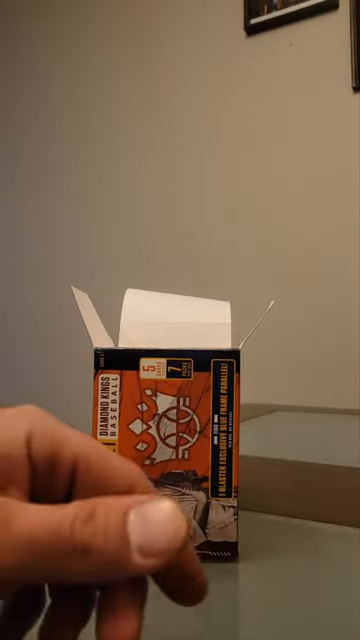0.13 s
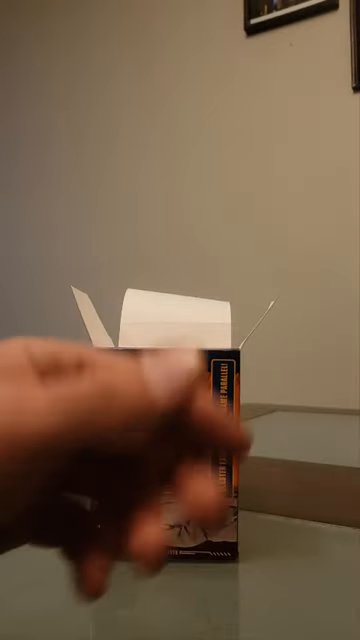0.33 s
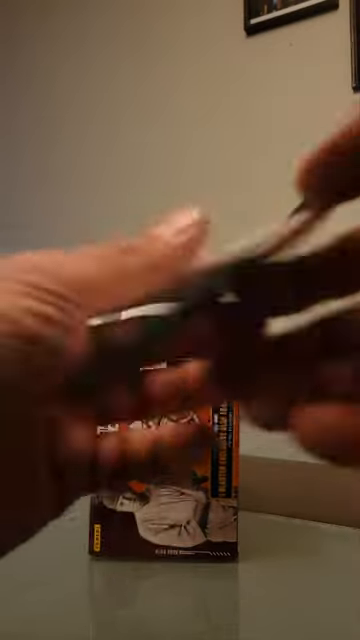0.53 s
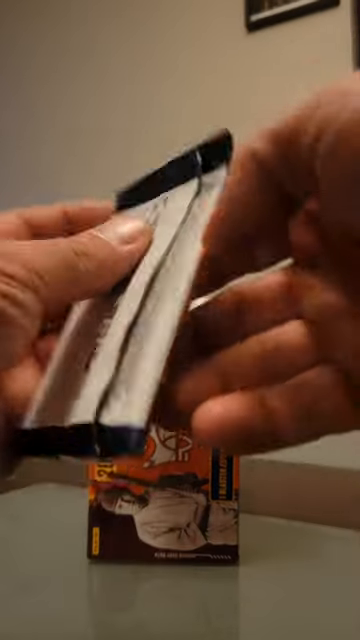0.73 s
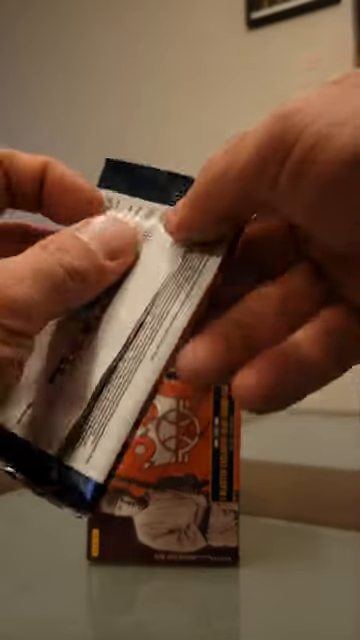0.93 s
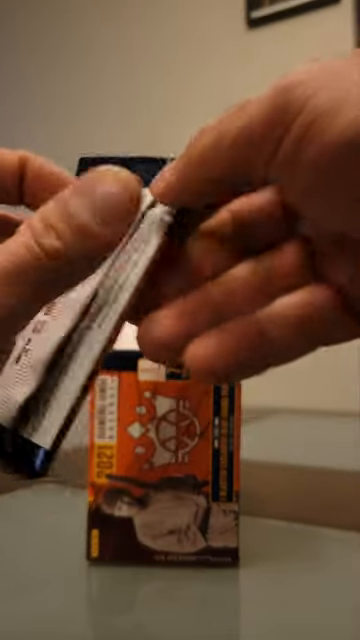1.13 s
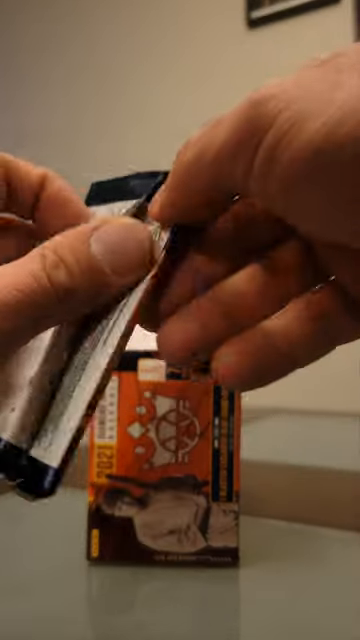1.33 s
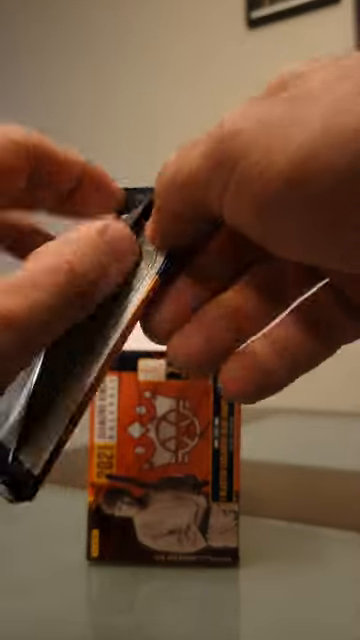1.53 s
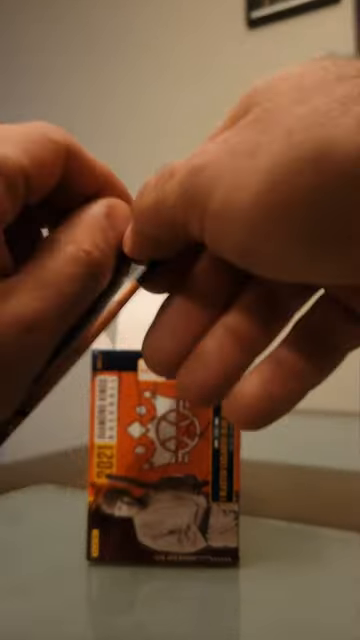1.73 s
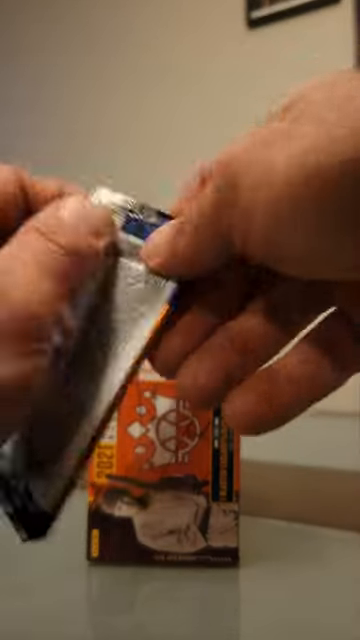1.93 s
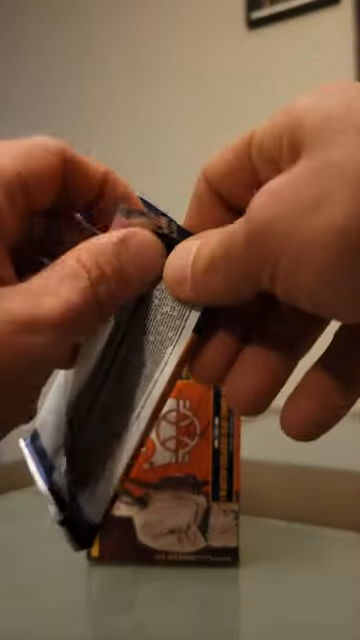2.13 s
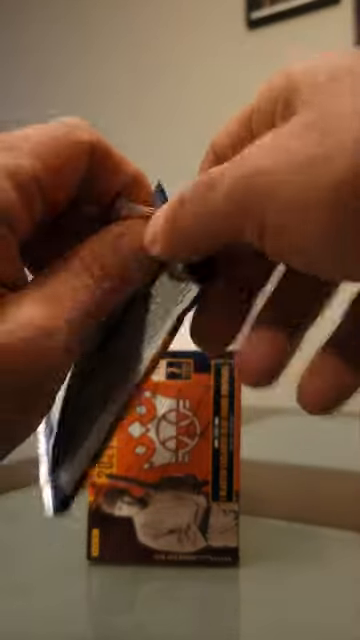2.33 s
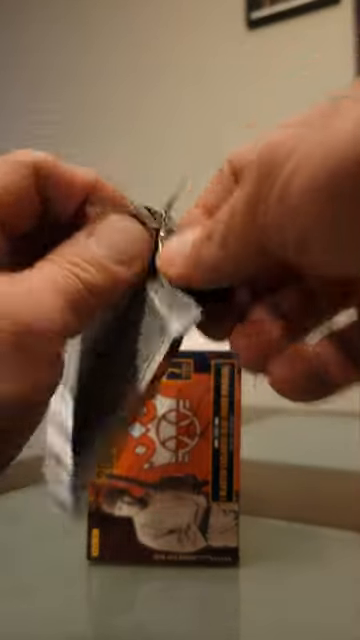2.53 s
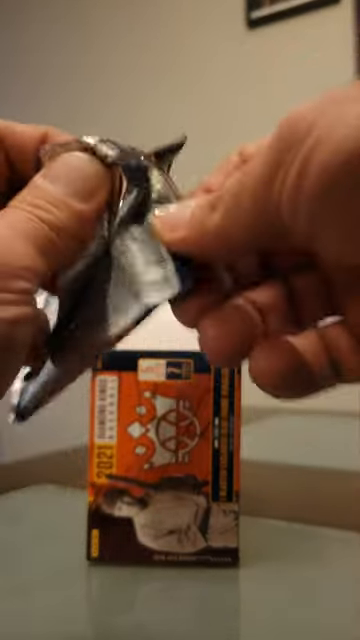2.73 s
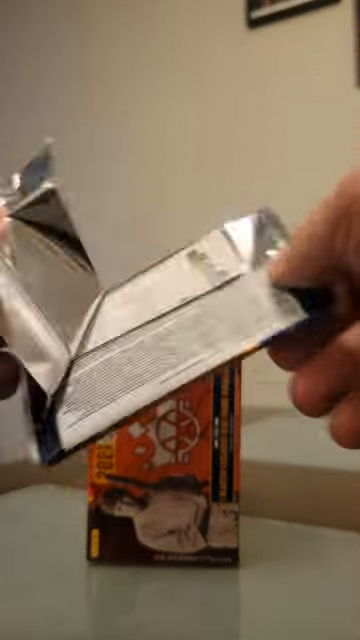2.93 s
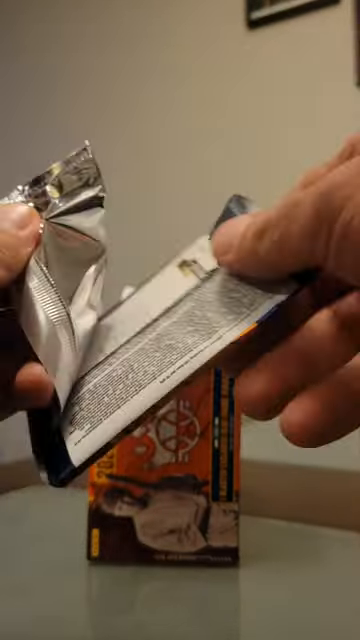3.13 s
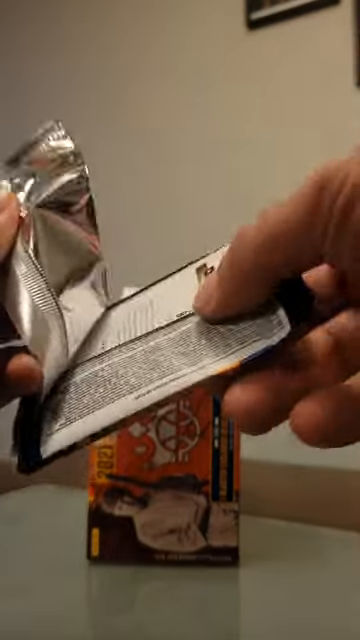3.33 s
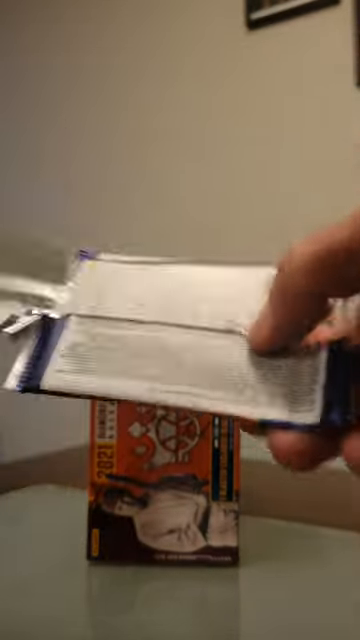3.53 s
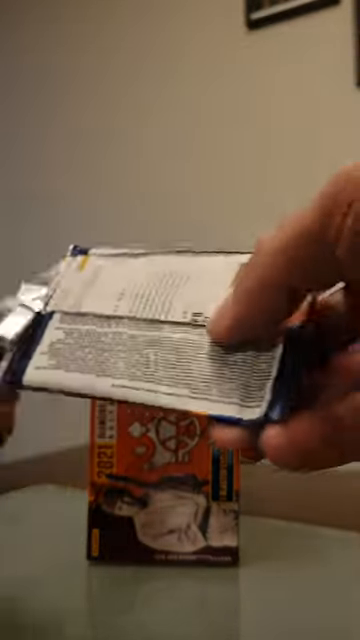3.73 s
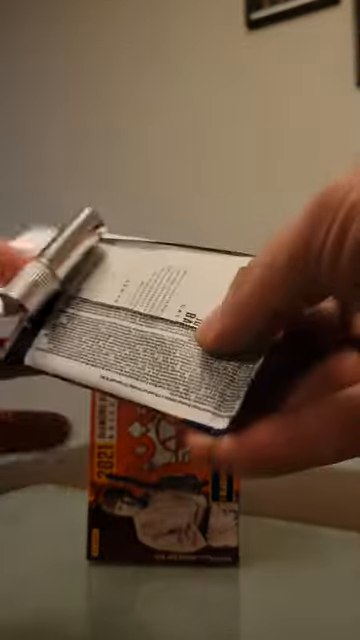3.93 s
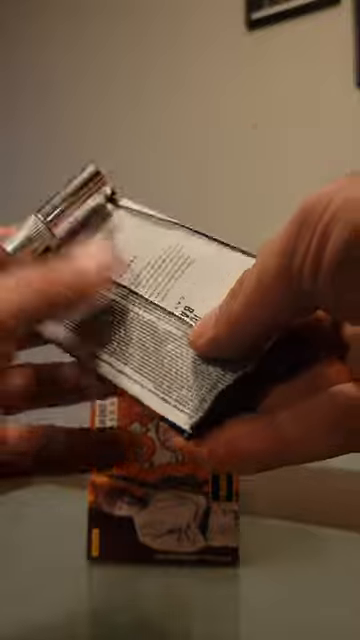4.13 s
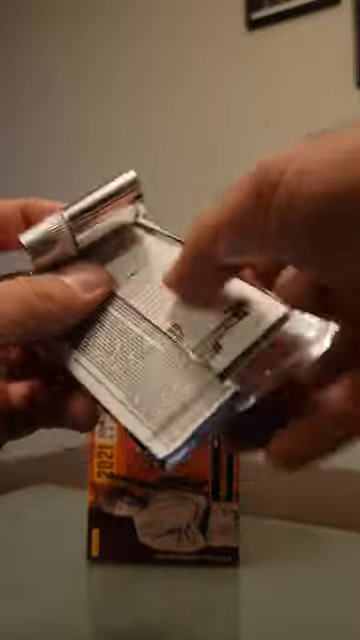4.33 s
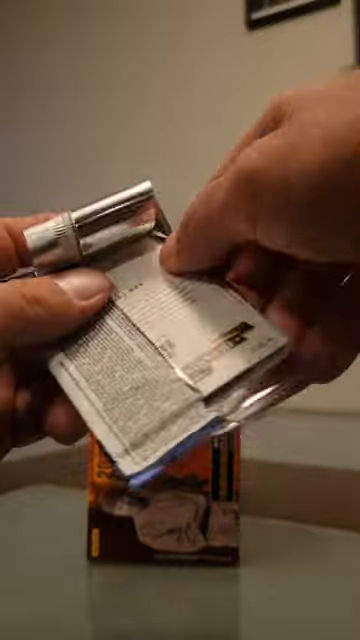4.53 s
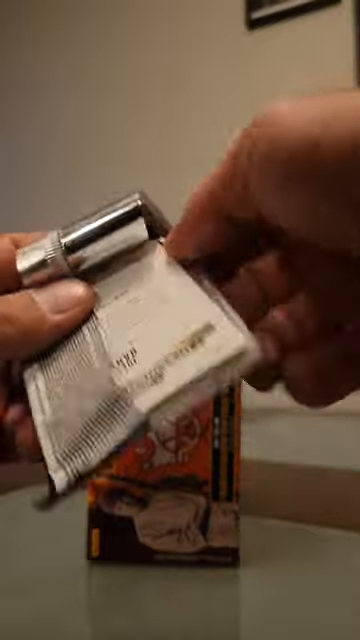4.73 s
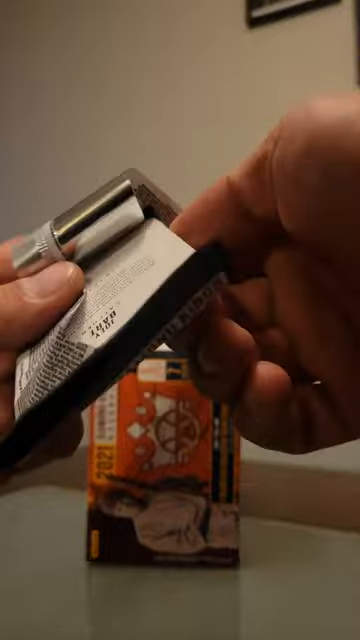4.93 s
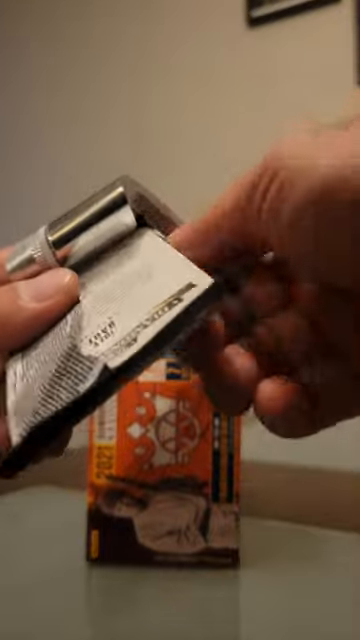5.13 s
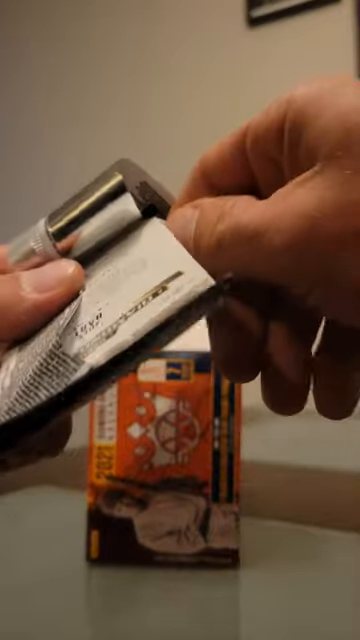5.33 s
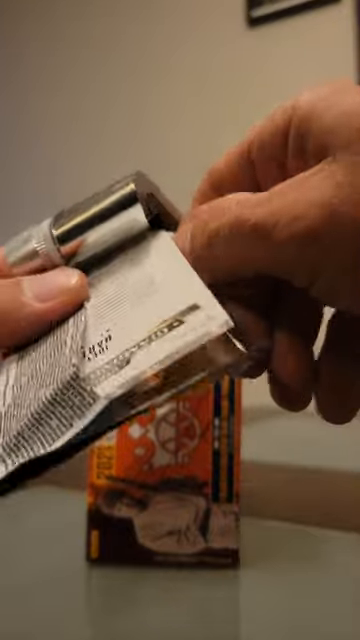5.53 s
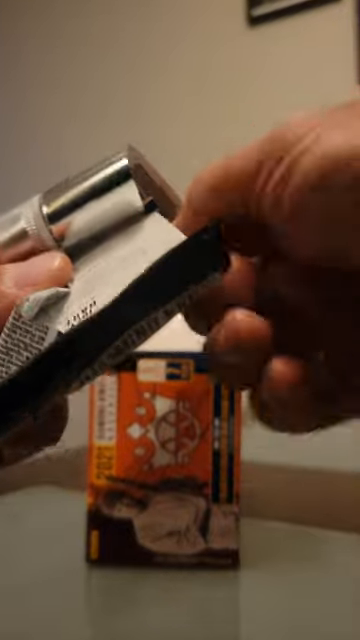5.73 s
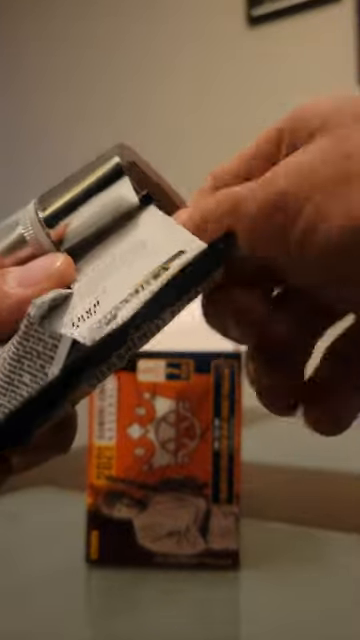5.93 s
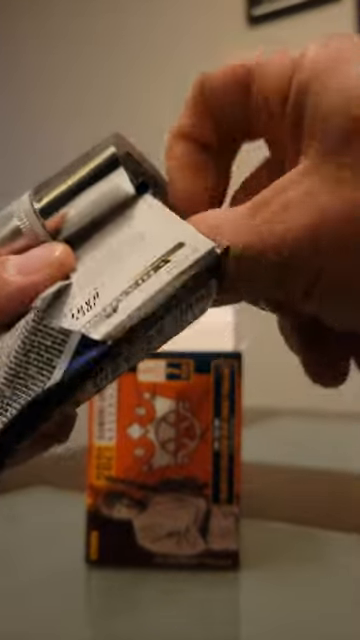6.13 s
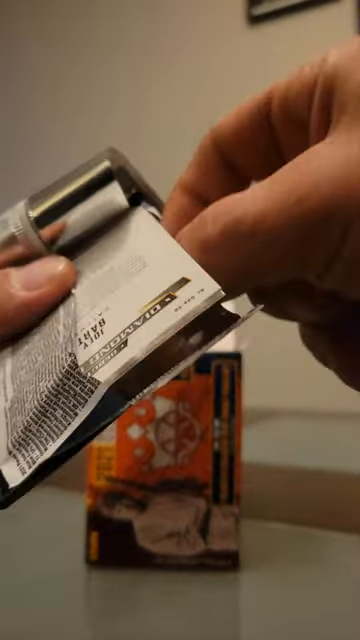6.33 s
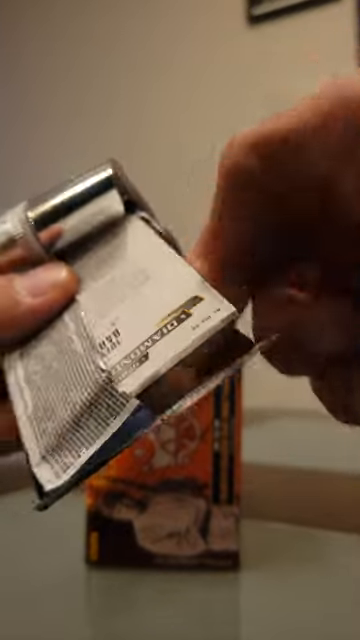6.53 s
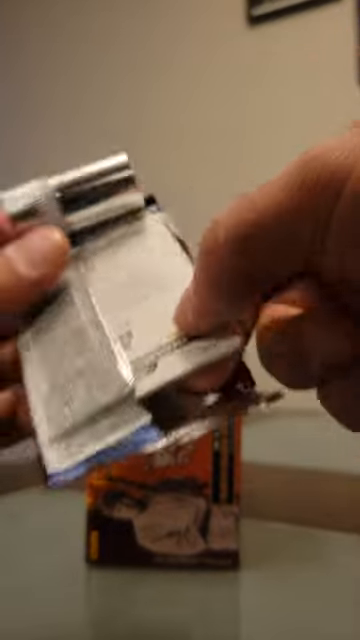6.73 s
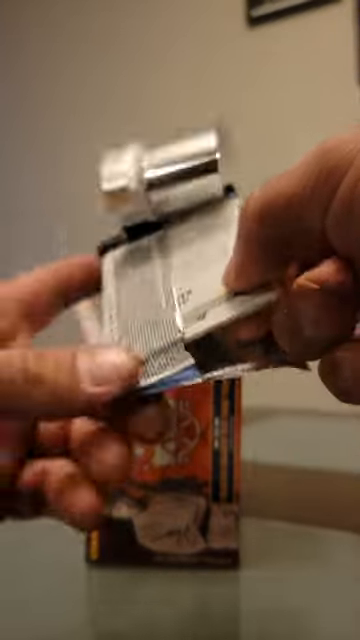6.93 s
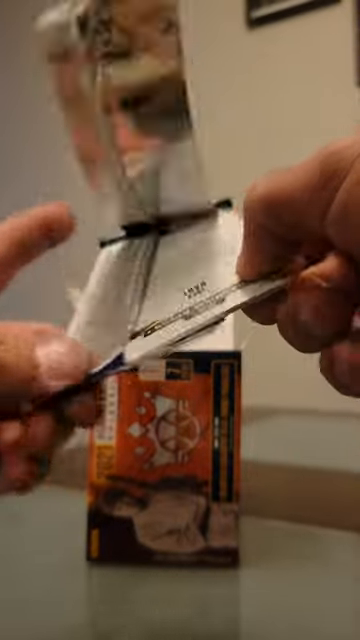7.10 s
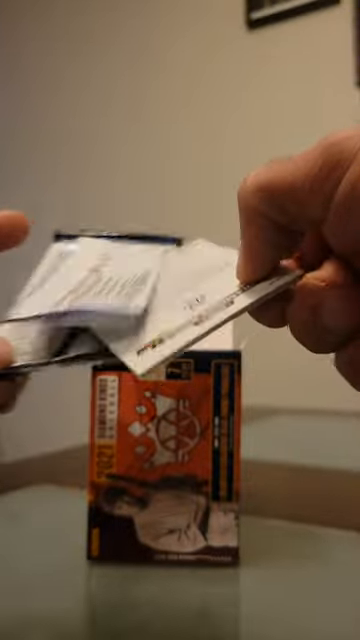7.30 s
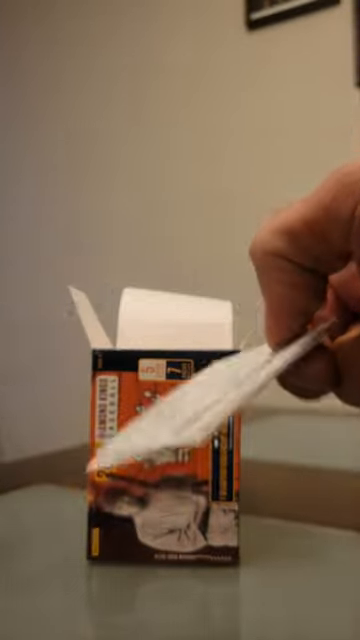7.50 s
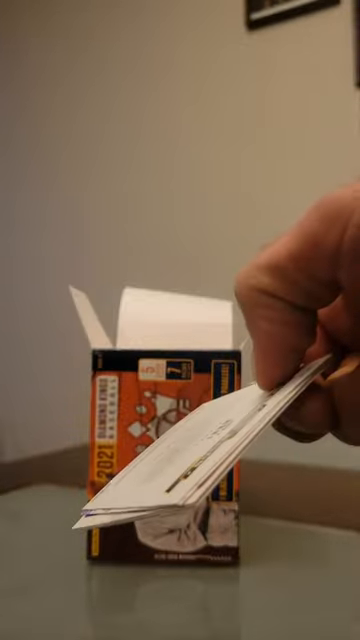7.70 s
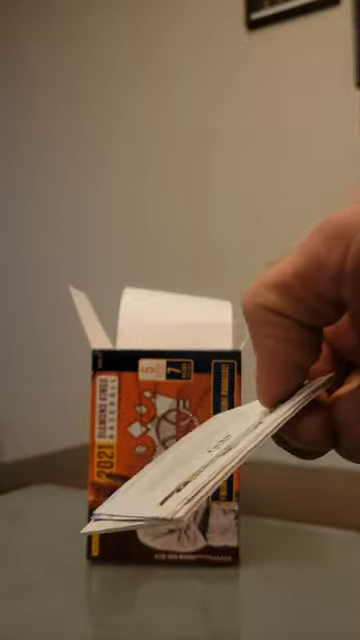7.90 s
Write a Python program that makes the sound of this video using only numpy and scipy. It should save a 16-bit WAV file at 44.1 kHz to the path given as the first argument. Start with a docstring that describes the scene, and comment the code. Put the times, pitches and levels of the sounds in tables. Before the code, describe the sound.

After a near-silent start, stiff foil crinkles in short crisp bursts, then rips densely around two seconds and hardest near three. A few muffled thumps accompany the tearing. The middle is calmer, with isolated clicks and small rustles, before a hard crack at six seconds and a rustling pull at seven. Close stereo phone-like pickup, left-heavy, small room with very short echo and low hum.

```python
"""In a small quiet room, hands tear a foil pack open close to a phone on a table.
Creases in the foil snap one by one and in dense rips: short bursts of random clicks, each with a brief ring.
Rips, rustles and the rub of the fingers are noise in tiny bursts, coloured like foil; soft thuds are low swings.
A faint hum, a tone that comes and goes and room noise lie underneath.
Two microphone ports hear it all with different colour and phase."""
import sys
import numpy as np
from scipy import signal
from scipy.fft import rfft, irfft, next_fast_len
from scipy.io import wavfile
from scipy.ndimage import uniform_filter1d

SR = 44100
rng = np.random.default_rng(int(sys.argv[2]) if len(sys.argv) > 2 else 0)


def generate_wav(sig):
    """Save sig (samples, or channels by samples) to the path in sys.argv[1] as 16-bit PCM at SR."""
    pcm = np.round(np.clip(np.atleast_2d(sig).T, -1, 1) * 32767).astype(np.int16)
    wavfile.write(sys.argv[1], SR, pcm)


N = 355490

# Steady room noise, its colour only: pitch_hz, density_db (per Hz)
AIR_COLOUR = [(20, -9), (45, -8), (100, -3), (200, -7), (320, -3.5), (480, -16), (800, -21.5), (2500, -24),
              (5000, -40.5), (8500, -49.5), (16000, -29.5)]
# A faint tone that comes and goes, one row: start_s, end_s, pitch_hz, level_db (rms at its fullest)
DRONE = (1, 9, 133, -74.5)
# How long the room rings: pitch_hz, t60_s (time to fall 60 dB)
ROOM_T60 = [(250, 0.22), (1000, 0.14), (4500, 0.15), (12000, 0.1)]
# How alike the two ports hear: pitch_hz, likeness (0-1), left_lead_rad
PORT_LIKENESS = [(60, 1, 1), (505, 1, 1.5), (1052, 0.56, 1.5), (1350, 0.84, 3), (3770, 0.51, 4.5),
                 (6100, 0.12, -0.5), (16000, 0, 1)]
# Low swings of the pack, the loose flap and the fingers:
# middle_s, peak_db (before the port gains), pitch_hz, half_length_s
THUDS = [(.126, -47.5, 101, 0.025), (.127, -48.5, 210, 0.025), (.5, -57, 480, 0.0052),
         (.57, -55, 260, .012), (.7, -52, 304, 0.014), (0.729, -46, 90.5, 0.0097),
         (0.897, -59.5, 89, 0.044), (1.874, -72, 316, 0.014), (2.619, -44.5, 65, 0.014),
         (2.617, -38, 205, 0.0069), (2.662, -35.5, 89.5, 0.0061), (2.66, -41, 302, 0.016),
         (2.977, -41.5, 71.4, 0.034), (3.073, -37.5, 328, 0.014), (3.56, -38.5, 362, 0.021),
         (3.609, -37, 389, 0.021), (5.659, -52.5, 251, 0.0087), (5.795, -54, 276, 0.01),
         (6.5, -47.5, 166, 0.01), (6.79, -53, 66, 0.022), (7.146, -43.5, 91.5, 0.012),
         (7.8, -58, 290, 0.014)]
# Colour of the foil at each port: pitch_hz, left_db, right_db
FOIL_COLOUR = [(59.7, -33.5, -26.5), (222, -6, -2.5), (360, -0.5, -2), (686, -5.5, 8), (1150, 1, 6),
               (1670, -0.5, 10.5), (2920, 4, 6), (4000, 4, 12), (5970, 2, 3), (6770, -4, -2.5),
               (9170, -20.5, -29.5), (14100, -12.5, -6.5), (16400, -15.5, -26)]
# Where the pack is held: time_s, left_minus_right_db
PLACE = [(0, 12.5), (1, 11.5), (1.7, 7.5), (2.1, 9.5), (2.6, 5), (3, 9.5), (3.5, 13.5), (4.2, 11), (4.9, 9),
         (5.5, 12.5), (6, 10.5), (6.5, 10.5), (6.9, 10), (7.3, 10.5), (8.06, 9.5)]
# Fingers handling the pack, a faint rub under the rustles that rises and falls, nearly silent at first:
# time_s, level_db (1.5-8 kHz), bass_db and treble_db (both against level_db)
GRIP = [(0, -97, 5, -12), (.55, -100, 16, -12), (.58, -60.5, -14, 8), (1.2, -63.5, -14, 1),
        (1.27, -72, 7, -12), (1.5, -66, -4, -12), (2.25, -53, -10, -9), (2.36, -67, -6.5, -6),
        (2.45, -60, -15, -24), (3.2, -64.5, 3, -2), (3.41, -64, -4, -5), (3.5, -62, 1, -12),
        (3.87, -61, -6.5, -13), (4.5, -63, 2.5, -18), (5.05, -66, 3.5, -15), (5.55, -62, -11, -16),
        (5.9, -58, 1.5, -14), (6.4, -60, 0.5, -11), (6.7, -59.5, 4.5, -9), (6.93, -68.5, 3, -7),
        (7.049, -57, 5, -12), (7.42, -69, 6.5, -14.5), (8.06, -74, 9.5, -13)]
# Rips and rustles, swells of fine crackle:
# full_from_s, full_until_s, level_db (1.5-8 kHz), rise_db_per_s, fall_db_per_s,
# bass_db and treble_db (both against level_db), sheet_ring_hz
RUSTLES = [(0.059, 0.11, -58, 500, 200, 1.5, -25, 2880), (0.157, 0.222, -65, 300, 500, 2, -24, 1720),
           (0.4, 0.446, -78, 300, 300, -12, -15, 4900), (0.567, 0.573, -47.5, 2000, 300, -4.5, -1, 4460),
           (0.67, 0.683, -48, 500, 500, -5, -9, 1030), (.73, 0.747, -45.5, 700, 400, -3.5, -1.5, 2760),
           (0.851, 0.863, -52.5, 700, 700, -4, 12, 1700), (0.999, 1.007, -50.5, 600, 300, -3, -1, 1036),
           (1.146, 1.185, -52, 250, 250, -13, 1.5, 1700), (1.315, 1.363, -53, 2000, 200, -7, -8, 2050),
           (1.423, 1.432, -46.5, 400, 500, -1.5, -7, 2070), (1.531, 1.548, -55.5, 400, 400, -4.5, -6, 4130),
           (1.618, 1.71, -53.5, 1500, 200, -3, 2, 4260), (1.877, 1.951, -36.5, 148, 398, -5, -6.5, 4620),
           (2.144, 2.18, -46, 205, 503, 0, -7, 3050), (2.393, 2.416, -47, 1005, 400, -11, -8, 2070),
           (2.498, 2.546, -59, 296, 400, -18, -22, 2060), (2.67, 2.685, -29, 312, 255, -5, -8.5, 1715),
           (2.835, 2.825, -35, 500, 600, -4.5, -8, 1765), (2.916, 2.988, -32, 202, 350, 4, -13.5, 1700),
           (3.017, 3.063, -36.5, 200, 800, 0, -10, 1380), (3.167, 3.193, -40, 203, 500, -3.5, -7.5, 1720),
           (3.254, 3.268, -48, 200, 247, 1.5, -0.5, 2900), (3.533, 3.577, -36, 700, 200, 2.5, -16, 2860),
           (3.602, 3.621, -34, 252, 272, -2, -2.5, 2750), (3.72, 3.766, -51, 500, 200, 2.5, -12, 2750),
           (4.107, 4.15, -58, 296, 400, -16, -23, 3790), (4.287, 4.328, -58.5, 898, 300, -8, -3, 3200),
           (4.36, 4.398, -67.5, 300, 301, -17, -12, 1400),
           (4.457, 4.467, -50.5, 505, 500, -10.5, -39, 2093), (4.533, 4.56, -53, 400, 701, -9, -21, 2070),
           (4.746, 4.758, -54.5, 702, 299, 4.5, -30, 2150), (5.26, 5.316, -53.5, 298, 152, -5, -4, 1420),
           (5.401, 5.406, -49.5, 700, 616, -28, 4, 2850), (5.737, 5.8, -62, 154, 150, -7.5, -20.5, 1413),
           (5.854, 5.881, -44, 1500, 700, -16, 4, 5640), (6.103, 6.12, -45, 704, 500, -6.5, -6.5, 3790),
           (6.167, 6.253, -55.5, 100, 120, -16.5, -17, 3670), (6.492, 6.503, -37, 498, 298, -8, -4.5, 6060),
           (7.183, 7.245, -40.5, 255, 178, -2, -3, 5860), (7.478, 7.514, -54, 1494, 148, -10.5, -6.5, 2870)]
# Creases that snap: time_s, level_db (1.5-8 kHz), bass_db and treble_db (both against level_db),
# ring_hz (the freed patch), ring_db (against level_db)
SNAPS = [(0.1383, -38, 4.5, -16, 1870, 8), (0.458, -70, 1, -12, 1290, 1), (0.5643, -42.5, 11, -8, 2840, -2),
         (0.5836, -29.5, -10, -8, 1950, 0), (0.6413, -37, -23, 4, 7390, -7),
         (0.6677, -30.5, 3, -8, 1240, -2), (0.6793, -28.5, -4, -10, 665, 1),
         (0.7233, -38, -12, -18, 5400, -1), (0.7383, -33.5, 5, -17, 2920, -8),
         (0.8692, -40, 2, -9, 1630, 5.5), (0.98, -48, 2.5, -8, 1120, 0.5), (1.014, -42, -2, -13, 1170, 5),
         (1.0502, -45, -13, -10, 1800, 4), (1.076, -45, -9, -14, 2070, 0.5),
         (1.1021, -35.5, 2, 3, 1750, 2.5), (1.1157, -43, -3, -12, 1100, -4.5),
         (1.1412, -40, -8, -5, 1770, -3.5), (1.18, -47, 10, -6, 6940, 4), (1.1903, -39, -6, -1, 1340, -2.5),
         (1.294, -29.5, -4, -14, 1960, -9), (1.298, -31, -4.5, 3, 2050, -8),
         (1.324, -37, -1, -8, 1900, 7.5), (1.3301, -37, 3, 1, 1090, -8), (1.3681, -33, -13, 5.5, 3700, 7),
         (1.3908, -30.5, -9.5, -13, 4200, 2.5), (1.413, -34, -5, -11, 1230, -5.5),
         (1.4279, -29.5, 0, -11.5, 3880, -5), (1.4394, -32, 0, -12, 1380, -11),
         (1.4697, -42.5, -4, -19, 1850, -1), (1.503, -48.5, 4, 2, 5660, -5),
         (1.6254, -36.5, -24, 2, 1230, -1.5), (1.6313, -34, -8, 2.5, 1090, -4.5),
         (1.6805, -29.5, -11, -2.5, 1380, -8), (1.737, -34, -37.5, -11, 3790, -5),
         (1.7597, -33.5, -1.5, -12, 1720, 8.5), (1.7641, -37.5, 0, -3, 1850, -3.5),
         (1.7824, -36.5, -2, -5, 900, -9), (1.8019, -36, 6, -13, 590, 1.5),
         (1.8127, -31.5, 0.5, -5, 1650, 2.5), (1.8231, -32, -7, -5, 1440, -7.5),
         (1.833, -39, -11, -3, 1770, 2.5), (1.8414, -26.5, -1, 2, 1400, -12.5),
         (1.8552, -18.5, -10, -5, 1730, -2), (1.8739, -27, -12, 5.5, 1830, 0),
         (1.8882, -26.5, -2, -1, 805, -0.5), (1.9077, -22, -23, -3, 6960, -1.5),
         (1.9126, -18, -12, -2, 1700, -1), (1.9256, -21, -7, 0.5, 4800, 6.5), (1.944, -28, -16, 1, 1980, 0),
         (1.9529, -25.5, -9, -8, 1870, -2), (1.9894, -19.5, -12, -9, 2900, 4.5),
         (1.9959, -27.5, -8, -2, 4720, 0), (2.014, -20.5, -12.5, 3.5, 4640, 4.5),
         (2.0242, -31, -16, -16, 3660, -5), (2.062, -32, -30, -8, 2890, 5.5),
         (2.0815, -24.5, -26, -4, 1790, -5), (2.0885, -37, -6, 10, 4030, -4.5),
         (2.1154, -34.5, -2, -3, 1860, 2), (2.138, -29.5, -7, -2, 3160, -4.5),
         (2.156, -17.5, -12, -18, 3030, 1), (2.1723, -29, -24, -13, 3000, 5.5),
         (2.185, -25, -16, -4, 1720, -4.5), (2.1901, -34, -11, 6, 5800, -3),
         (2.1997, -27, -10, -14, 1850, 1), (2.2063, -26, -28, -1, 6140, 6.5),
         (2.2159, -29, -19, -14, 1870, -7), (2.2509, -37, -4, -25, 1090, 2),
         (2.2751, -44, -17, 6, 5580, -2), (2.2928, -32.5, -10, -20, 1890, 0),
         (2.3022, -40.5, -11, -6, 1130, 6), (2.3882, -26, -13, -13.5, 4870, -4),
         (2.4, -34, -2, -4, 1290, -5), (2.4222, -22.5, -6, -12, 2060, 2), (2.4704, -35, -6, -7, 2220, -2),
         (2.4856, -41.5, 0, -19, 1030, 6), (2.5128, -34, -12, -2, 1670, 8),
         (2.539, -38, -3, -5, 3680, -4.5), (2.5554, -22.5, -21, -18, 3700, 0),
         (2.574, -49, -5, -21, 1790, 2.5), (2.6075, -23, 1.5, 3, 1260, 5),
         (2.6322, -27.5, 0, 7, 3770, -4.5), (2.6464, -24, -6, -4, 3770, -6), (2.6524, -27, 0, 2, 2150, -12),
         (2.6635, -24, -11, 1, 3740, 0.5), (2.6765, -22.5, -22, -5, 5750, 1),
         (2.68, -25.5, -23, 1, 3550, -6), (2.6923, -15.5, -11, -10, 1930, -14.5),
         (2.747, -39, 4, -15, 1530, -1), (2.7912, -27, -11, -16, 1240, -4),
         (2.8288, -26.5, -10, -5, 1210, 1), (2.836, -18.5, -16, -5.5, 1890, -10.5),
         (2.8469, -46, -8, 18, 1310, -1), (2.8783, -32, -9, -4, 1440, -1),
         (2.8902, -28.5, -14, -6, 1680, 6), (2.9074, -24.5, 5.5, -6, 1700, -0.5),
         (2.9194, -21.5, -7, -15, 1710, 1.5), (2.9388, -20, -10, -3, 1430, -8),
         (2.948, -20.5, 7, -11, 1520, -11.5), (2.9555, -13, -13, -1.5, 5470, 5),
         (2.9616, -16, 0, -19, 646, 1), (2.9735, -13, -5, -8.5, 1750, 0.5),
         (3.009, -26.5, 1, -26, 2700, -3), (3.0489, -32.5, 7, -8, 880, 0.5),
         (3.1004, -38.5, 7, -22, 1060, 4), (3.12, -39.5, -1, -1, 980, 4.5),
         (3.1471, -35, -21, -1, 1860, 9.5), (3.1816, -28.5, 4.5, -5, 510, -5.5),
         (3.2156, -30, 5, 4, 1980, -7.5), (3.2566, -33.5, -14, 2, 2730, 4.5),
         (3.2669, -30.5, -7.5, -3, 1070, -1), (3.3047, -36, 2.5, 1, 2740, 3),
         (3.4475, -34, -1.5, 2, 6500, -11), (3.4784, -32, 6.5, -3, 3670, -5.5),
         (3.5452, -31, 0, -12, 830, -3), (3.5799, -22.5, -4, -10, 1080, -9),
         (3.584, -22.5, -4, -14, 1110, -1), (3.6064, -24.5, 0, 11, 3000, -5),
         (3.6156, -18.5, 4.5, 5.5, 7550, -9), (3.6348, -28.5, 9, 4, 500, -1.5),
         (3.7189, -24.5, -10.5, -4, 1120, 1), (3.7423, -36, -2, -8, 2870, 4),
         (3.7657, -36, -10, -6, 1040, 0), (3.7778, -34, 0, -12, 1850, 1.5), (3.7993, -43, 0, -21, 1230, -2),
         (3.8197, -36, 8, -16, 960, 7), (3.8276, -37, 2, -22, 683, -0.5), (3.9024, -26.5, -22, -6, 5250, 4),
         (3.9738, -45, 6, -11, 1320, -1), (4.0175, -36.5, -8, -5, 1180, 9.5),
         (4.1025, -44, -13, -11, 4240, -2), (4.1436, -40, -16, -20, 3600, 4),
         (4.2138, -51, -3, -13, 970, -7), (4.2728, -43.5, -10, -22, 3210, 0),
         (4.3308, -40, 1.5, -8, 5600, 5), (4.363, -40, -15, -23, 2860, -1),
         (4.3766, -42, -5, -17, 1290, -9), (4.3881, -28.5, -3.5, -20, 1950, -14.5),
         (4.4088, -54, -4, -14, 1060, -1.5), (4.558, -46, -13, -21, 3380, 1.5),
         (4.5674, -49, 5, -18, 1030, 2.5), (4.6597, -32.5, -9.5, -8, 3420, -3),
         (4.7453, -28, -1.5, -26, 1200, 0), (4.7586, -30, -17, -20.5, 1800, -6),
         (4.8433, -42, -9.5, -32, 5600, -3), (4.8829, -31.5, -9.5, -5.5, 1170, 3),
         (4.951, -48, 0, -12, 1360, -3), (4.9821, -40.5, -8, -10, 1230, -13.5),
         (5.0123, -49, -11, -16, 2020, -1), (5.0766, -36.5, -2, -4.5, 1060, -5),
         (5.1195, -42.5, 3.5, -24, 1840, 1), (5.2622, -32, -5.5, -11, 4700, -10),
         (5.2983, -45, 4, 2, 520, -11), (5.3379, -51, 10, -12, 1070, -4), (5.4288, -52, -18, -2, 2650, -3),
         (5.454, -39, -24, -13, 2820, -1), (5.5015, -39.5, -31, -4.5, 5550, -3),
         (5.5752, -41, -2.5, -2, 3400, 0), (5.5891, -29, -21, -13, 5650, 0),
         (5.6315, -46, -4, -11, 6270, 0), (5.6582, -26.5, -6.5, -21, 5570, -4),
         (5.6944, -42.5, -11, -36, 1370, -9), (5.7316, -30, -15, -16, 2890, 6),
         (5.7408, -29.5, -2, -4, 1180, -6), (5.7845, -28.5, -10, -4, 6600, 4),
         (5.796, -30.5, 9, -13, 1200, -6), (5.8416, -19.5, -10, -8, 1090, -9.5),
         (5.938, -42.5, -18, 5, 6240, -0.5), (5.9463, -29.5, 1, 0, 1050, 0.5),
         (5.9652, -30.5, -9, -8, 1430, -4), (5.97, -27.5, -10, -25, 2670, -1),
         (6.006, -10.5, -3.5, -9, 3200, -1), (6.1138, -34, -22, -14, 3120, -4),
         (6.176, -28, -26, -6.5, 4150, -7), (6.2072, -39.5, -9, -20, 4130, -5),
         (6.319, -31, -2, -5, 870, -1), (6.4406, -43, -4, -23, 3420, 6),
         (6.4697, -26.5, -17, -1.5, 7020, 5), (6.4904, -34, -3, 2, 1120, 2.5), (6.503, -26, -6, 1, 6550, 1),
         (6.5092, -24.5, -15, 1.5, 5700, -5), (6.5696, -38.5, -10, 0, 6400, 0),
         (6.6272, -42, 0.5, -8, 510, -2), (6.7468, -28.5, -23, -13, 2800, 0),
         (6.8342, -38, -23, -18.5, 4110, 4), (6.8433, -45.5, -3.5, -17, 2910, -3),
         (6.8611, -45, 1, -10, 704, 0.5), (7.0186, -44, 4, -21, 3230, 4),
         (7.0529, -38.5, 3, -34, 2930, 8.5), (7.0792, -40.5, 4, -21, 1020, 6.5),
         (7.1228, -43, -7, -17, 3880, -2), (7.1403, -25.5, 3, -8, 1940, -19),
         (7.1722, -32.5, -17, 9, 1110, -4), (7.1896, -30, -13, 7, 1070, 3.5),
         (7.2141, -31.5, 3.5, 6, 1410, -17), (7.2287, -34, -4, 4, 6570, 8), (7.261, -28, -3, 1.5, 6000, 0),
         (7.2961, -34, -3, -2, 910, 0.5), (7.4832, -39, -7, 5, 6650, 7), (7.4937, -28, -15, 1, 2740, 4.5),
         (7.634, -52.5, -11, -7, 3080, 3), (7.7775, -45.5, -6, -13, 3530, -10),
         (7.7951, -32.5, 1.5, -13, 1160, -3.5), (7.9003, -49, 5, -14, 1700, 1.5)]

HZ = np.fft.rfftfreq(next_fast_len(N + 4096), 1 / SR)  # pitches at which filters are drawn
AIR_DB = -67  # rms, before the port gains
HUM_HZ, HUM_DB = 147.5, -73  # level is rms
BASS_HZ, TREBLE_HZ = 1500, 8000  # edges of the three bands
EDGE_HZ = 16050  # upper limit of the sound
# A snap has three stages: level against the snap's own (dB), time to fall 10 dB (ms)
CRACK_DB, CRACK_MS = -3.5, 0.17
BODY_DB, BODY_MS = 0, 2.0
SETTLE_DB, SETTLE_MS = -25, 22


def amp(db):
    """Turns dB into a gain."""
    return 10 ** (np.asarray(db) / 20)


def evened(x):
    """Scales to rms 1."""
    return x / np.sqrt(np.mean(abs(x) ** 2) + 1e-20)


def read(table, hz):
    """Reads a table's columns at any pitch, with straight lines over log pitch."""
    table_hz, *columns = np.transpose(table)
    return np.array([np.interp(np.log(hz + 1), np.log(table_hz), column) for column in columns])


def filtered(x, gain):
    """Filters a sound by a gain given at each pitch in HZ."""
    size = 2 * (len(HZ) - 1)
    return irfft(rfft(x, size) * gain, size)[..., :N]


def ports(shared, apart):
    """The left port hears the shared sound; the right a phase-turned part of it plus sound of its own."""
    same, lead = read(PORT_LIKENESS, HZ)
    same = np.clip(same, 0, 1)
    turned = filtered(shared[1], same * np.exp(-1j * lead))
    own = filtered(apart, np.sqrt(1 - same ** 2))  # keeps the total power
    return np.array([shared[0], turned + own])


def air():
    """Room noise is coloured random noise; the hum is a steady sine, the other tone swells and fades."""
    t = np.arange(N) / SR
    colour = amp(read(AIR_COLOUR, HZ)[0])
    noise = rng.standard_normal((2, N))
    wash, other = (amp(AIR_DB) * evened(filtered(v, colour)) for v in noise)
    hum = amp(HUM_DB) * np.sin(2 * np.pi * HUM_HZ * t)
    start, end, hz, db = DRONE
    swell = np.sin(np.pi * np.clip((t - start) / (end - start), 0, 1)) ** .5
    drone = amp(db) * swell * np.sin(2 * np.pi * hz * t)
    port_gains = amp([[1.5], [-.6]])
    return ports(wash * port_gains, other) + np.sqrt(2) * (hum + drone)  # root 2: from rms to peak


def room(x):
    """Echoes are sparse taps of random sign, one in every 20 samples; each band dies at its own speed."""
    taps = np.zeros((2, SR // 2))
    start = np.arange(160, SR // 2 - 20, 20)
    at = start + rng.integers(0, 20, (2, len(start)))
    np.put_along_axis(taps, at, rng.choice([-1., 1.], at.shape), 1)
    hz, t, z = signal.stft(taps, SR, nperseg=256)
    t60 = read(ROOM_T60, hz)[0][:, None]
    tail = signal.istft(z * amp(-60 * t / t60), SR, nperseg=256)[1]
    return signal.fftconvolve(x, tail / np.linalg.norm(tail[0]), axes=1)[:, :N]


def thuds():
    """Each soft thud is one low sine that swells and fades."""
    out = np.zeros(N)
    for s, db, hz, length in THUDS:
        t = np.arange(-length, length, 1 / SR)
        at = round((s - length) * SR)
        out[at:at + len(t)] += amp(db) * np.hanning(len(t)) * np.sin(2 * np.pi * hz * t)
    return out * amp([[3.0], [-1.5]])  # left and right port gains


def shares(s, db, bass_db, treble_db):
    """Splits a level into power in bass, middle and treble at each port: (band, port, ..)."""
    pan_db = np.interp(s, *np.transpose(PLACE))
    side = amp(np.array([pan_db, -pan_db]))  # power; the two differ by pan_db
    power = amp(2 * (db + np.array([bass_db, 0 * db, treble_db])))
    return power[:, None] * 2 * side / side.sum(0)


def swells(t):
    """The fingers' rub rises and falls; each rustle rises, holds and dies away, as power over time."""
    s, *columns = np.transpose(GRIP)
    power = shares(t, *(np.interp(t, s, column) for column in columns))
    for start, end, db, rise, fall, bass_db, treble_db, _ in RUSTLES:
        down_db = rise * np.maximum(start - t, 0) + fall * np.maximum(t - end, 0)
        power += shares(t, db - down_db, bass_db + 0 * t, treble_db + 0 * t)
    return power


def crackle(per_s=450, spread_db=6.0, smooth=.35):
    """Many small creases slip at random, a few larger; skin rubbing on foil fills the gaps."""
    slips = rng.random(N) < per_s / SR
    size = amp(spread_db * np.minimum(rng.exponential(1, N), 4)) * slips
    grains = signal.oaconvolve(size, np.exp(-np.arange(400) / 85.0))[:N]  # each slip dies away
    step = 32  # samples between readings of the slow swells
    power = np.repeat(swells(np.arange(0, N, step) / SR), step, axis=-1)[..., :N]
    return power * (smooth + (1 - smooth) * grains / grains.mean())


def patchy(x, patchy_db=2.8):
    """The colour shifts in patches of time and pitch as different parts of the sheet move."""
    z = signal.stft(x, nperseg=256, noverlap=192)[2]
    patches = rng.standard_normal(z.shape[1:])
    patches = uniform_filter1d(patches, size=4, axis=0)  # smooth over pitch
    patches = uniform_filter1d(patches, size=20, axis=1)  # smooth over time
    z = z * amp(patchy_db * evened(patches))
    return evened(signal.istft(z, nperseg=256, noverlap=192)[1][:, :N])


def sheet_ring(drive, width_hz=510.0):
    """A broad resonance wanders as the sheet bends: shift the noise down, smooth it, shift it back."""
    s, hz = np.transpose(RUSTLES)[[0, -1]]
    ring_hz = np.interp(np.arange(N) / SR, s, hz)
    turn = np.exp(2j * np.pi * np.cumsum(ring_hz) / SR)
    r = np.exp(-np.pi * width_hz / SR)
    return evened((turn * signal.lfilter([1 - r], [1, -r], drive / turn)).real)


def snaps(rise_ms=0.45):
    """Power of the snaps: each crease cracks, rattles out in a few ms, then the sheet settles."""
    lead = 300  # samples kept ahead of each snap for its rise
    power = np.zeros((3, 2, N + 6000))
    ms = np.arange(-lead, 5000) / SR * 1000
    stages = [(CRACK_DB, CRACK_MS), (BODY_DB, BODY_MS), (SETTLE_DB, SETTLE_MS)]
    fall = sum(amp(2 * db - 20 * np.maximum(ms, 0) / fall_ms) for db, fall_ms in stages)
    shape = fall * np.exp(np.minimum(ms, 0) / rise_ms)
    for s, *levels, _, _ in SNAPS:
        at = round(s * SR) - lead
        power[..., at:at + len(ms)] += shares(s, *levels)[..., None] * shape
    return power[..., :N]


def rings(cycles=9.0, least_ms=8.0):
    """The patch freed by a snap swings a few cycles at its own pitch."""
    out = np.zeros((2, N + 2000))
    t = np.arange(1500) / SR
    for (s, *levels, hz, db), turn in zip(SNAPS, rng.random(len(SNAPS))):
        t60 = least_ms / 1000 + cycles / hz  # seconds to fall 60 dB
        onset = 1 - np.exp(-t / 0.00011)
        swing = amp(db - 60 * t / t60) * onset * np.sin(2 * np.pi * (hz * t + turn))
        at = round(s * SR) - 30
        out[:, at:at + len(t)] += np.sqrt(shares(s, *levels)[1])[:, None] * swing  # middle band level
    return out[:, :N]


def foil(ring_db=-10.5):
    """Bursts of power drive rattle and noise through the colour of the foil, band by band."""
    colour = amp(read(FOIL_COLOUR, HZ))
    bass = 1 / (1 + (HZ / BASS_HZ) ** 6)
    treble = 1 / (1 + (TREBLE_HZ / (HZ + 1)) ** 16)
    bands = (bass, (1 - bass) * (1 - treble), treble)
    # in each pair, the first is shared by the ports and the second is the right port's own
    noise = patchy(rng.standard_normal((2, N)))
    rattle = rng.choice([-1., 1.], (2, N))
    fine = np.sqrt(crackle())  # from power to loudness of the wave
    shared = rings() + amp(ring_db) * fine[1] * sheet_ring(noise[0])
    apart = np.zeros(N)
    for snap, rub, band in zip(np.sqrt(snaps()), fine, bands):
        gain = evened(colour * np.sqrt(band))
        shared += filtered(snap * rattle[0] + rub * noise[0], gain)
        apart += filtered(snap[1] * rattle[1] + rub[1] * noise[1], gain[1])
    return ports(shared, apart)


def scene():
    """Foil and thuds with their room echo, over the room noise."""
    near = foil() + thuds()
    return near + amp(-14.0) * room(near) + air()


def record(dry):
    """Cuts away everything above the upper limit."""
    low_pass = signal.firwin(255, EDGE_HZ, window=("kaiser", 9), fs=SR)
    return signal.oaconvolve(dry, low_pass[None], "same")


dry = scene()
out = record(dry)
generate_wav(out)
```